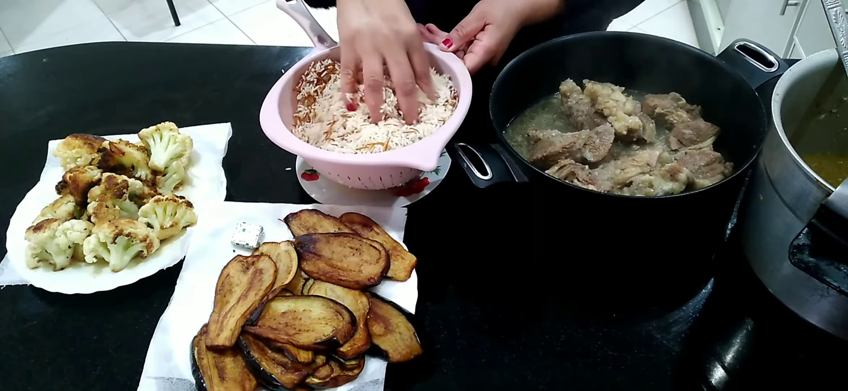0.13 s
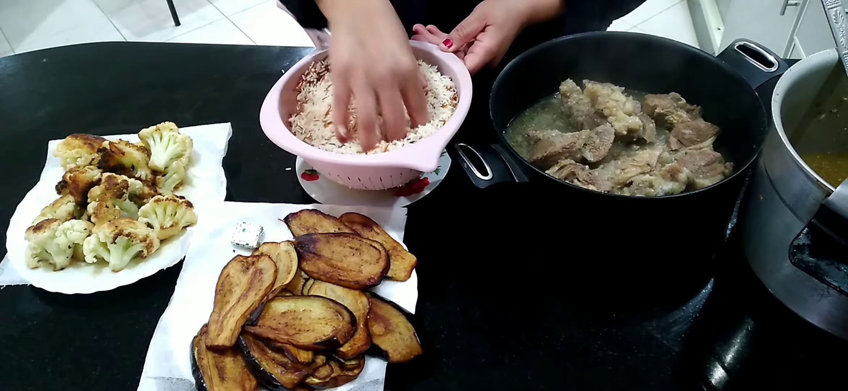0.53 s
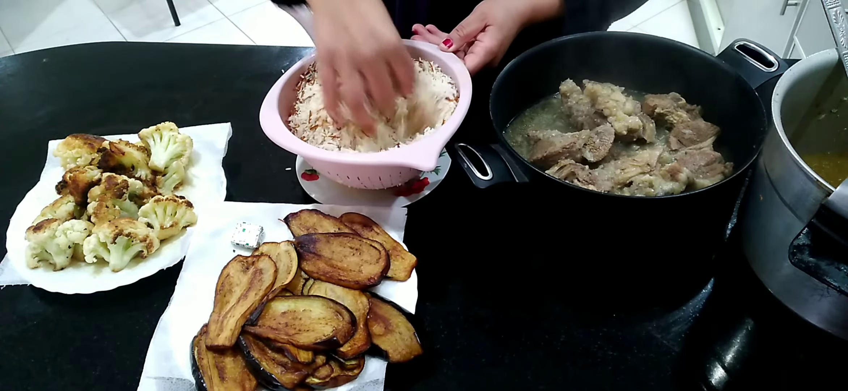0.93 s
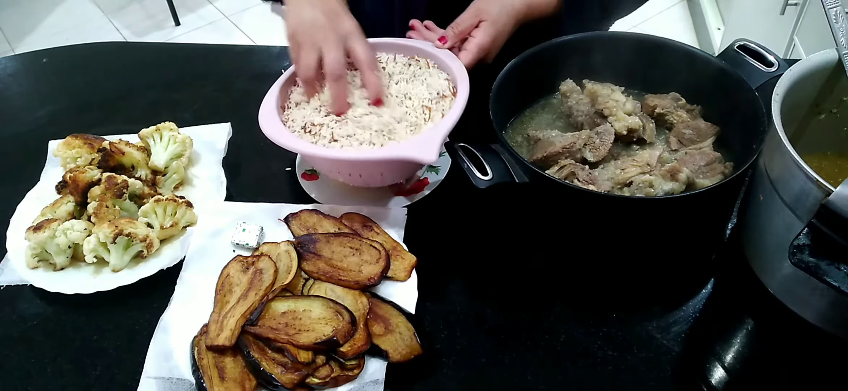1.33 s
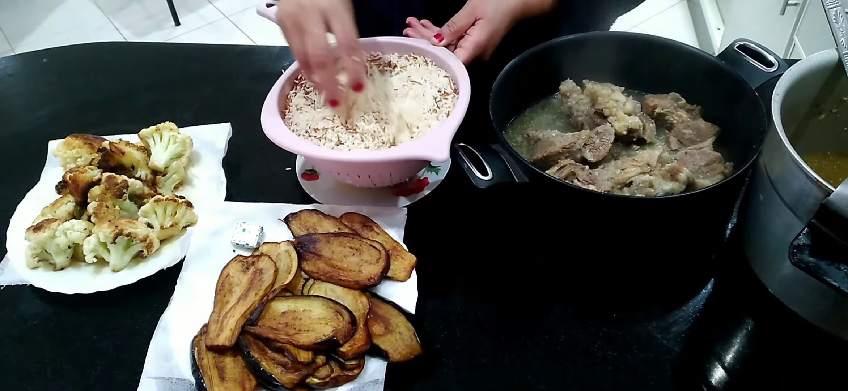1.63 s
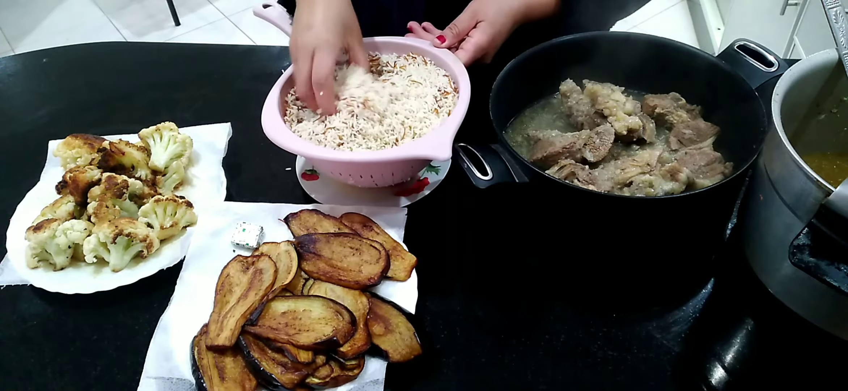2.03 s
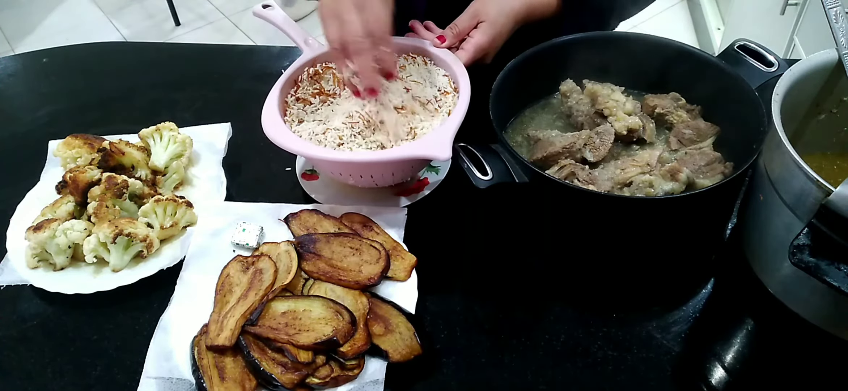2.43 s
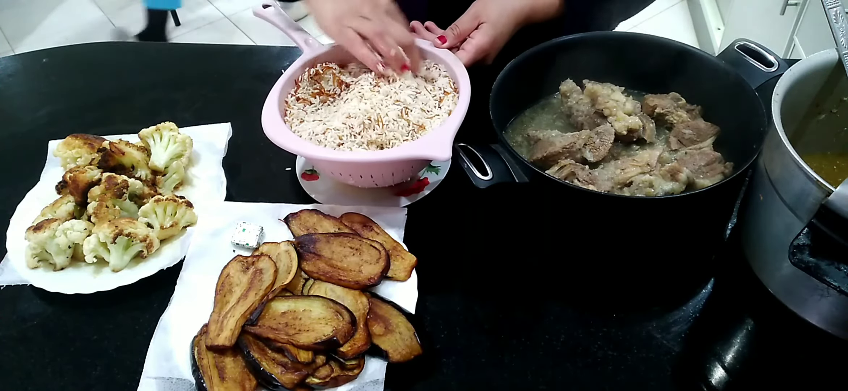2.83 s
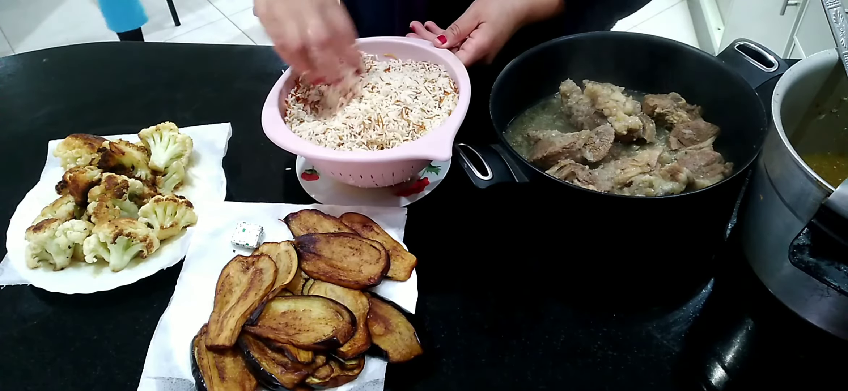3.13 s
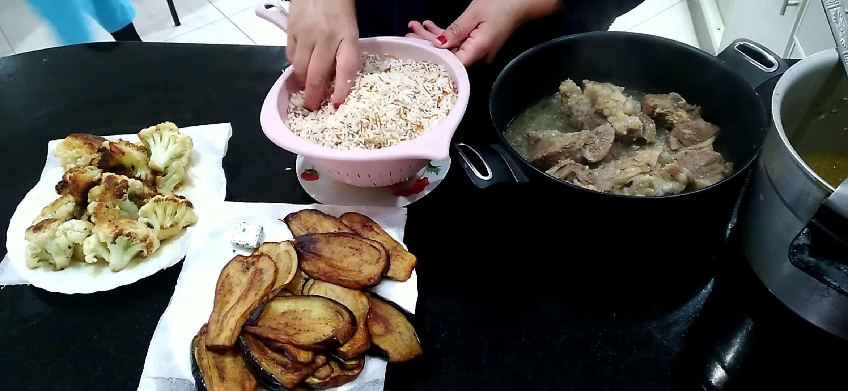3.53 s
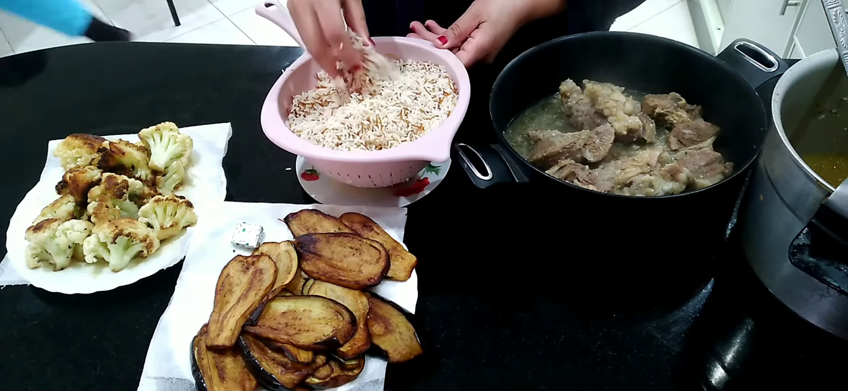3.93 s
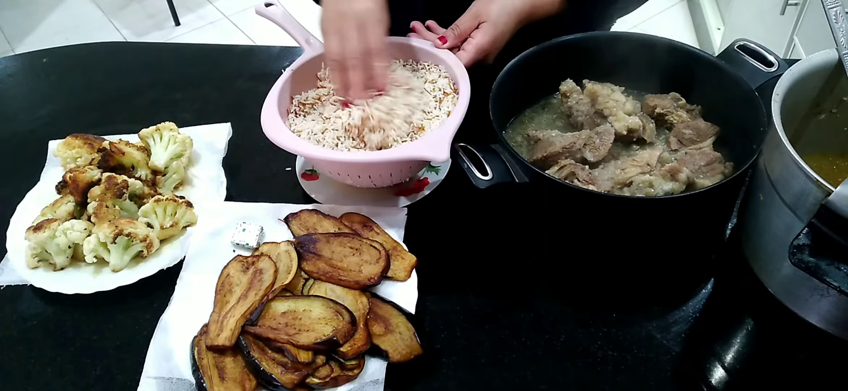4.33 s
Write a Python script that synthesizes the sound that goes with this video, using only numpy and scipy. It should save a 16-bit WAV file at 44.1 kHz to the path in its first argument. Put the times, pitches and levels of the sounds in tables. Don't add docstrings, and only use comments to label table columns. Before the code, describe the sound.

In a kitchen, a faint clock ticks unevenly over steady mains hum, throbbing engine and traffic rumble. Fingers stir dry rice in a plastic colander: a brief burst at half a second, a harder one soon after one second, then sparse light clicks. Later the colander rubs softly on its plate, and a last few grains click. The small stereo recorder is some distance away.

```python
import sys
import numpy as np
from scipy import signal
from scipy.io import wavfile
from scipy.ndimage import uniform_filter1d

SR = 44100
rng = np.random.default_rng(int(sys.argv[2]) if len(sys.argv) > 2 else 0)


def to_linear_factor(level_db):
    exponent = np.asarray(level_db, float) / 20
    return 10 ** exponent


def store_wav(level_fs):
    pcm = np.round(np.clip(np.atleast_2d(level_fs), -1, 1) * 32767)
    wavfile.write(sys.argv[1], SR, pcm.T.astype(np.int16))


N = 198141


def evened(x):
    return x / np.sqrt(np.mean(x ** 2) + 1e-20)


def read(points, hz):
    point_hz, value = np.transpose(points)
    return np.interp(np.log(hz + 1), np.log(point_hz + 1), value)


def add(mix, start_s, sound):
    part = mix[:, round(start_s * SR):][:, :sound.shape[1]]
    part += sound[:, :part.shape[1]]


def filtered(x, order, hz, kind="low"):
    return signal.sosfiltfilt(signal.butter(order, hz, kind, fs=SR, output="sos"), x)


def ring(x, modes):
    out = 0
    for hz, width_hz, db in modes:
        peak = signal.iirpeak(hz, hz / width_hz, SR)
        once = signal.lfilter(*peak, x)
        out = out + to_linear_factor(db) * signal.lfilter(*peak, once)
    return out


def colour(points):
    hz = abs(np.fft.fftfreq(4096, 1 / SR))
    log_gain = np.log(to_linear_factor(np.maximum(read(points, hz), -80)))
    return np.fft.ifft(np.exp(np.conj(signal.hilbert(log_gain)))).real[:1024]


def sides(db):
    return to_linear_factor([db / 2, -db / 2])


def noise(points, patch_db, size):
    # frequency in Hz, left-right likeness (0 to 1).
    likeness = [(30, .96), (150, .94), (380, .62), (750, .25), (1200, 0), (15000, 0)]
    # frequency in Hz, left-right difference in dB.
    tilt = [(60, 13.5), (150, 1), (380, 1.5), (950, 0.5), (2380, 0), (5980, 0.5), (15000, -1.0)]
    hop = size // 4
    frames, hz = N // hop + 5, np.fft.rfftfreq(size, 1 / SR)
    a, b, c, d, patches = rng.standard_normal((frames, len(hz), 5)).T
    patches = uniform_filter1d(patches, size=6, axis=0)
    patches = evened(uniform_filter1d(patches, size=8, axis=1))
    same = np.clip(read(likeness, hz), -1, 1)[:, None]
    left = a + 1j * b
    right = same * left + np.sqrt(1 - same ** 2) * (c + 1j * d)
    inside = (hz >= points[0][0]) & (hz <= points[-1][0])
    z = np.array([left, right]) * sides(read(tilt, hz))[..., None]
    z *= to_linear_factor(read(points, hz)[:, None] + patch_db * patches) * inside[:, None]
    return evened(signal.istft(z, nperseg=size, noverlap=size - hop)[1][:, :N])


def room(t60_s, size):
    t = np.arange(size) / SR
    taps = rng.standard_normal((2, size)) * (rng.random((2, size)) < .25) * to_linear_factor(-60 * t / t60_s)
    return taps / np.linalg.norm(taps[0])


def background():
    # time in seconds, level in dB, extra whoosh from nearness in dB.
    traffic = [(0.0, -49.5, -13.5), (0.12, -64, 3), (0.3, -66.5, -3), (0.36, -59, 1.5), (0.46, -54, -2),
               (0.66, -59, -6.5), (0.879, -71, 6.5), (0.96, -59, 0.5), (1.1, -63, 0.5), (1.44, -67.5, -2.5),
               (1.52, -68.5, 11.5), (1.9, -65.5, -2.5), (2.1, -68.5, 2), (2.9, -69, 2.5), (3.72, -66, -1),
               (3.961, -58.5, 0), (4.15, -64.5, -3), (4.49, -65, 5.5)]
    # frequency in Hz, density in dB per Hz.
    deep_air = [(8, 3.5), (25, -6.5), (48, -6.5), (60, -21.5), (75, -15), (100, -11.5), (125, -9),
                (160, -14), (220, -36.5), (300, -30.5)]
    rumble = [(88, -22.5), (150, -6.5), (198, -6), (310, -8), (400, -13.5), (525, -17.5), (596, -19),
              (775, -23), (878, -30), (1100, -34), (1580, -40), (2390, -40.5), (3000, -43), (3900, -87),
              (6600, -120)]
    treble = [(800, -7.5), (1200, -23), (2000, -22), (3400, 0), (6400, -8), (8000, -8.5), (9200, -6.5),
              (10700, -10.5), (15700, -12.5)]
    calm_db = -65.0
    t = np.arange(N) / SR
    s, level_db, near_db = np.transpose(traffic)
    swell_db = np.interp(t, s, level_db) - calm_db
    near_db = np.interp(t, s, near_db)

    hum = np.sqrt(2) * np.sin(2 * np.pi * 100.6 * t + np.array([[0], [.2]])) * sides(np.array([4.5]))
    deep = to_linear_factor(-51.5 + 0.21 * swell_db) * noise(deep_air, 1.8, size=8192)
    hiss = to_linear_factor(-88 + 0.047 * swell_db) * noise(treble, 1.0, size=512)

    whole = noise(rumble, 1.1, size=2048)
    low = filtered(whole, 3, 380)
    middle = filtered(whole - low, 4, 830)
    roar = to_linear_factor(-65 + 0.78 * swell_db) * evened(low)
    whoosh = to_linear_factor(-72 + 1.14 * swell_db + near_db) * evened(middle)
    far = to_linear_factor(-83.5 + 0.36 * swell_db) * evened(whole - low - middle)
    return deep + roar + whoosh + far + hiss + to_linear_factor(-56) * hum


def engine():
    # start in seconds, length in seconds, pitch in Hz, level in dB.
    surges = [(-0.12, 0.48, 45, -44), (0.426, 0.46, 46.46, -45.5), (0.955, 0.053, 46.2, -48),
              (1.004, 0.2, 45.6, -44.5), (1.206, 0.24, 46.4, -47), (1.5, 0.14, 45.4, -52),
              (1.695, 0.052, 42.5, -46), (1.831, 0.16, 42.2, -53), (2.008, 0.061, 44.05, -46),
              (2.118, 0.95, 37, -55.5), (2.518, 0.34, 37.64, -53), (2.975, 0.12, 38.5, -46),
              (3.35, 0.12, 40.2, -48), (3.48, 0.18, 42.66, -50.5), (3.68, 0.16, 42.1, -55.5),
              (3.81, 0.6, 46.9, -48)]
    out, t = np.zeros((2, N)), np.arange(N) / SR
    for s, length_s, hz, db in surges:
        span = slice(max(round(s * SR), 0), round((s + length_s) * SR))
        tone = np.sin(2 * np.pi * hz * t[span] + np.array([[0], [.3]])) * sides(np.array([6.5]))
        swell = abs(np.sin(np.pi * (t[span] - s) / length_s)) ** 0.6
        out[:, span] += to_linear_factor(db) * swell * tone
    return out


def clockwork():
    # time in seconds, knock in dB, ring in dB, gate open in seconds.
    ticks = [(0.0592, -60, -63.5, 0.025), (0.3022, -72, -76.5, 0.016), (0.5185, -57, -57.5, 0.023),
             (0.762, -75.5, -73.5, 0.012), (0.9802, -63.5, -64.5, 0.022), (1.2247, -62, -59.5, 0.025),
             (1.4418, -66, -66, 0.025), (1.6863, -73.5, -73, 0.013), (1.9028, -66, -68, 0.024),
             (2.1477, -74.5, -71.5, 0.017), (2.364, -66.5, -66.5, 0.027), (2.6074, -75, -71, 0.021),
             (2.8241, -70, -68, 0.025), (3.072, -73.5, -74.5, 0.016), (3.2837, -66, -61.5, 0.01),
             (3.5283, -73.5, -73.5, 0.034), (3.7444, -60.5, -62.5, 0.028), (3.989, -73, -71.5, 0.026),
             (4.2062, -64.5, -64.5, 0.028), (4.4512, -75.5, -74, 0.016)]
    # frequency in Hz, width in Hz, level in dB.
    case_modes = [(2178, 380, -2), (2477, 450, -5)]
    wheel_modes = [(3235, 1160, 10), (4080, 370, 0), (6320, 740, 4.5), (12400, 2700, -11)]
    pallet_modes = [(9000, 590, 4.5), (9510, 1100, 3)]
    shelf_modes = [(656, 62, 6), (988, 41, -2.5)]
    pallet_db = [-4.5, -3]
    pan_db = [3, 2.5]
    lead_s = .008
    out, t = np.zeros((2, N)), np.arange(5000) / SR
    for k, (s, knock_db, ring_db, hold_s) in enumerate(ticks):
        blow = np.roll(room(0.045, size=5000), round(lead_s * SR), axis=1) * (t >= lead_s)
        lead_in = 0.3 * t / lead_s
        onset = (t - lead_s + 0.0035) / 0.0011 * (t > lead_s - .001)
        echoes = room(0.56, size=5000) * np.clip(lead_in + onset, 0, 1)
        parts = (ring(blow + 1.8 * echoes, case_modes), ring(echoes, wheel_modes),
                 ring(echoes, pallet_modes), ring(blow, shelf_modes))
        case, wheel, pallet, shelf = (p / np.sqrt(np.mean(p[:, 350:750] ** 2)) for p in parts)
        gate = to_linear_factor(-14 / (1 + np.exp((lead_s + hold_s - t) / 0.0022)))
        sound = 0.69 * to_linear_factor(knock_db) * case
        sound += to_linear_factor(ring_db) * (0.52 * wheel + 0.58 * to_linear_factor(pallet_db[k % 2]) * pallet)
        thud = to_linear_factor(-70.0 + 0.7 * (knock_db + 62)) * shelf
        add(out, s - lead_s, gate * sound * sides(pan_db[k % 2])[:, None] + thud)
    return out


def heard(dry, wet):
    out = np.array([np.roll(dry[0], 16), dry[1]])
    turn = np.pi * np.arange(N) / SR * 31
    for k in range(3):
        share = np.sqrt(2 / 3) * np.cos(turn + k * np.pi / 3)
        out += wet * signal.oaconvolve(dry * share, room(0.073, size=2000), axes=1)[:, :N]
    return out


def snaps_and_pats():
    # time in seconds, peak in dB, centre in Hz, left-right difference in dB.
    snap_rows = [(0.019, -60.5, 6660, 6), (0.1166, -62, 6700, 0), (0.4944, -61, 7040, 7),
                 (0.499, -55, 9280, -6), (0.509, -41.5, 8700, 4), (0.5376, -43, 8600, 2),
                 (0.613, -64, 7800, 0), (1.1009, -49, 8500, 1), (1.1134, -50.5, 8950, 4),
                 (1.1404, -64, 9160, 3), (1.1645, -37.5, 8700, -5), (1.174, -57, 9030, 4),
                 (1.19, -36, 7200, 10), (1.221, -40, 7670, -4), (1.2364, -40, 6800, 1.5),
                 (1.258, -42.5, 7800, 15), (1.3678, -60, 8900, 0.5), (1.7654, -63.5, 8900, 4),
                 (1.8494, -53, 8100, 4), (2.6888, -70.5, 7700, 5), (2.6958, -65.5, 7150, 13),
                 (2.7004, -61.5, 8910, 2), (2.7372, -63, 6450, 1), (2.7504, -56, 6500, 4),
                 (2.899, -58.5, 8140, 3), (3.2211, -60, 6850, 2), (3.2665, -49.5, 7700, 5),
                 (3.298, -48.5, 6900, -15), (3.4431, -62.5, 7440, 3), (4.459, -57, 6900, -15)]
    # time in seconds, peak in dB, ring in Hz.
    pat_rows = [(0.0199, -71, 4090), (1.0913, -50, 3530), (1.1102, -43, 3480), (1.1518, -34, 3500),
                (1.1635, -37, 3500), (1.1744, -37, 3440), (1.18, -33, 3320), (1.187, -39, 3630),
                (1.202, -31.5, 4350), (1.2518, -67, 2730), (1.258, -31, 3640), (1.296, -44, 3650),
                (1.8402, -56, 3600), (1.8574, -61, 4940), (2.7375, -51, 4100), (2.7525, -64, 3160),
                (2.761, -58, 3430), (2.7891, -51, 3900), (2.8005, -60, 3600), (2.8405, -50.5, 3330),
                (2.8992, -59, 3550), (3.2216, -63, 2810), (3.267, -51, 3500), (3.3184, -54, 3090),
                (3.6084, -62, 3867), (3.8511, -55, 3440)]
    # frequency in Hz, width in Hz, level in dB.
    crack = (12400, 13000, -16.5)
    out = np.zeros((2, N))
    snaps = [(s, db, hz, 0.58, pan_db) for s, db, hz, pan_db in snap_rows]
    pats = [(s, db - 6.5, hz, 0.3, -1.5) for s, db, hz in pat_rows]
    for s, db, hz, spread, pan_db in snaps + pats:
        modes = [(hz, spread * hz, 0)]
        if hz > 5000:
            modes.append(crack)
        click = ring(room(0.0022, size=500)[0], modes)
        add(out, s + .0006, to_linear_factor(db - 2.0) * click / abs(click).max() * sides(pan_db)[:, None])
    return heard(out, 0.72)


def arch(t, start, top, end):
    away = np.interp(t, [start, top, end], [1, 0, 1])
    return -25 * away ** np.where(t < top, 3.4, 2.6)


def stirring():
    # start in seconds, deepest in seconds, end in seconds, effort in dB, brightness in dB.
    strokes = [(0.044, 0.09, 0.125, -83, -27), (0.145, 0.16, 0.172, -89.5, 3),
               (0.484, 0.506, 0.53, -78.5, -23), (0.505, 0.542, 0.578, -67, 0.5),
               (0.55, 0.557, 0.6, -76, -8), (1.069, 1.137, 1.17, -69, -4.5), (1.142, 1.17, 1.225, -63, 4.5),
               (1.175, 1.257, 1.322, -65.5, -1), (1.848, 1.849, 1.868, -81, -11),
               (2.738, 2.761, 2.772, -84, 3), (2.77, 2.801, 2.81, -77, 2), (2.81, 2.84, 2.875, -75.5, -10),
               (2.862, 2.9, 2.925, -86, -6), (3.269, 3.268, 3.29, -78, 3), (3.283, 3.286, 3.36, -66, -1),
               (3.417, 3.454, 3.462, -87, 1), (3.49, 3.494, 3.515, -86.5, 9.5),
               (3.523, 3.54, 3.549, -87, 12.5), (3.555, 3.613, 3.642, -72, 8),
               (3.84, 3.862, 3.872, -77, -38), (4.441, 4.459, 4.48, -81, 10)]
    # start in seconds, hardest in seconds, end in seconds, level in dB.
    rubs = [
        (3.275, 3.31, 3.62, -73.5),
        (3.54, 3.6, 3.65, -71),
        (0.9, 1, 1.2, -74.5),
    ]
    # frequency in Hz, density in dB per Hz.
    rice = [(900, -58), (1500, -11.5), (2300, -2), (3400, -5), (4600, -4), (6300, -7), (7800, -9),
            (9200, 1), (10600, -8), (13000, -17), (15600, -22)]
    # frequency in Hz, width in Hz, level in dB.
    bowl_modes = [(667, 53, -1.5), (1015, 220, -8), (1185, 180, -3), (1398, 1020, 2.5)]
    plate_modes = [(690, 110, 9.5), (883, 170, 1.5), (1230, 240, -3.5)]
    t = np.arange(N) / SR
    clumps = to_linear_factor(evened(uniform_filter1d(rng.standard_normal(N), size=300)))
    sizes = to_linear_factor(4.0 * np.minimum(rng.exponential(1, N), 5))
    hits = rng.random(N) < 10000 / SR
    clicks = hits * rng.choice([-1, 1], N) * sizes * clumps
    both = np.tile(clicks, (2, 1))
    grains = heard(np.tile(signal.oaconvolve(clicks, colour(rice))[:N], (2, 1)), 6.9)
    body = evened(ring(heard(both, 1.4), bowl_modes))
    plate = evened(ring(body + heard(both, 4.5), plate_modes))

    dull = filtered(grains, 2, 6500)
    sharp = evened(grains - dull)
    dull = evened(dull)
    airy = filtered(sharp, 4, 9700, "high")

    out = np.zeros((2, N))
    for start, deepest, end, effort_db, bright_db in strokes:
        span = slice(round(start * SR), round(end * SR) + 130)
        body_db = -9.5 + 5.5 * (t[span] - start) / (end - start)
        sound = 1.73 * dull[:, span] + to_linear_factor(body_db) * body[:, span]
        sound += to_linear_factor(bright_db) * (sharp - airy)[:, span]
        sound += to_linear_factor(1.57 * bright_db - 5.5) * airy[:, span]
        fade = signal.windows.tukey(len(body_db), 260 / len(body_db))
        level = to_linear_factor(effort_db + arch(t[span], start, deepest, end))
        out[:, span] += level * sound * sides(np.array([1.2])) * fade
    for start, hardest, end, db in rubs:
        out += to_linear_factor(db + arch(t, start, hardest, end)) * ((t > start) & (t < end)) * plate
    return out


def scene():
    return background() + engine() + clockwork() + snaps_and_pats() + stirring()


def band_limit(x):
    return signal.sosfilt(signal.butter(12, 15740, fs=SR, output="sos"), x)


def record(dry):
    return band_limit(dry)


dry = scene()
out = record(dry)
store_wav(out)
```